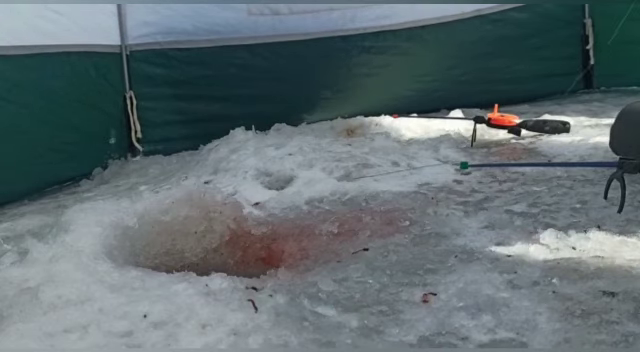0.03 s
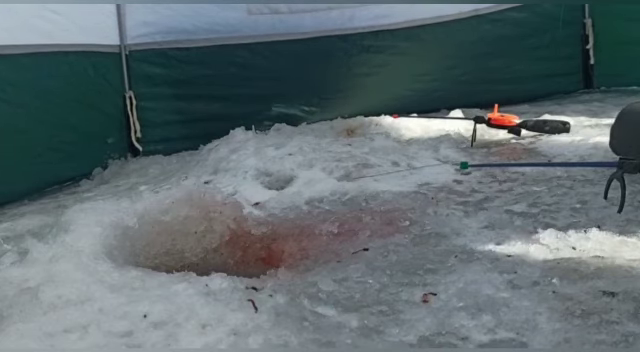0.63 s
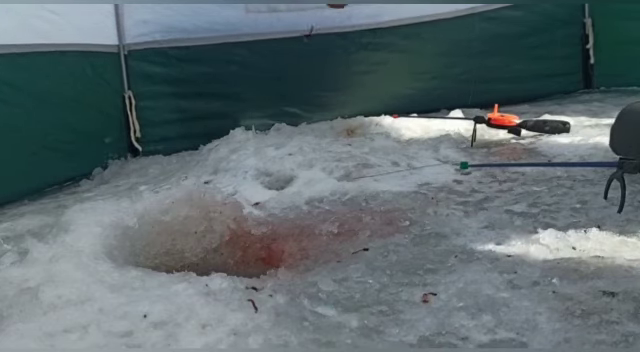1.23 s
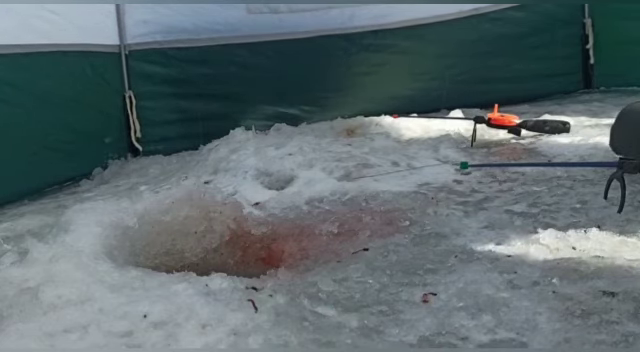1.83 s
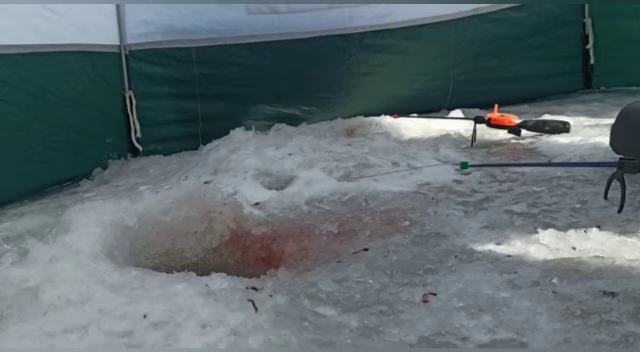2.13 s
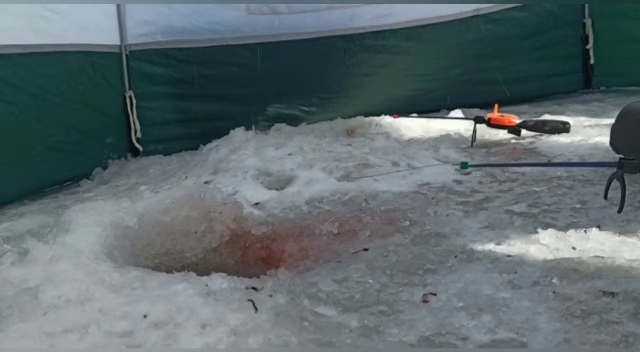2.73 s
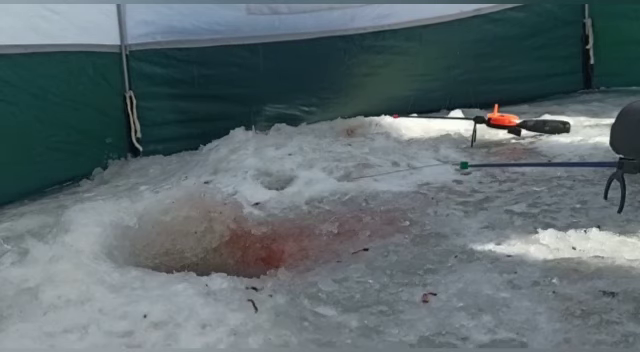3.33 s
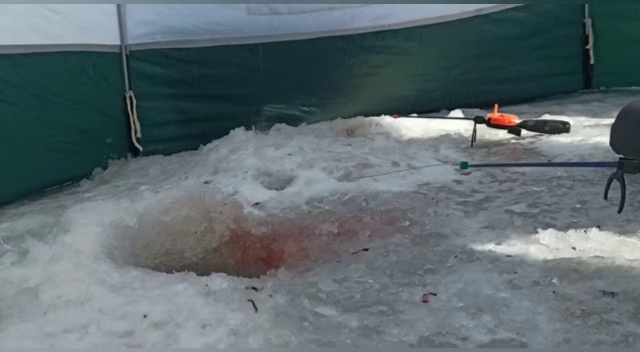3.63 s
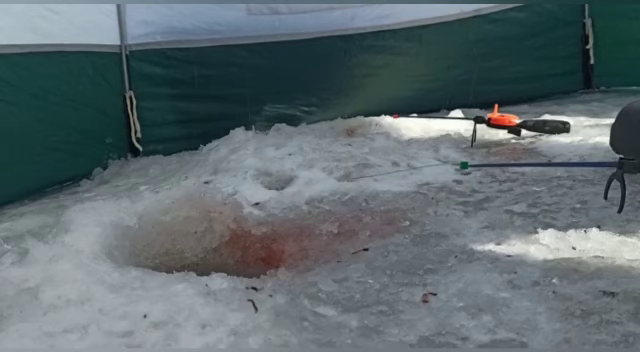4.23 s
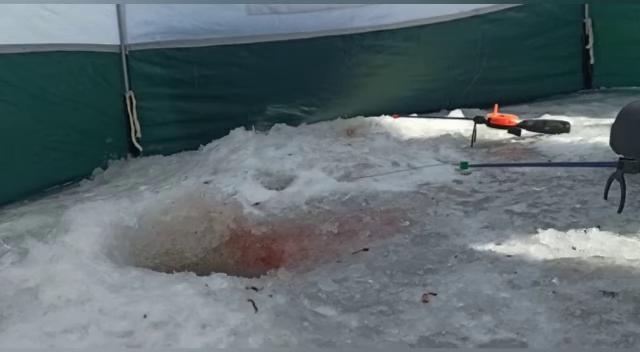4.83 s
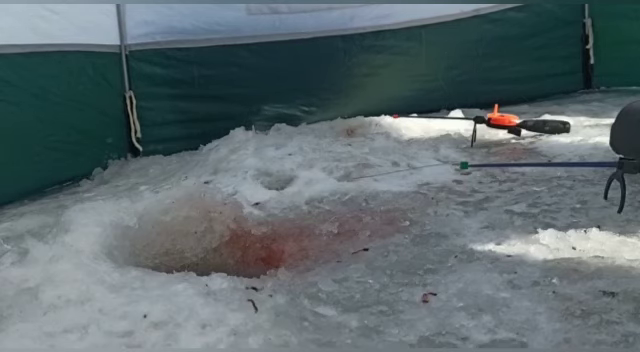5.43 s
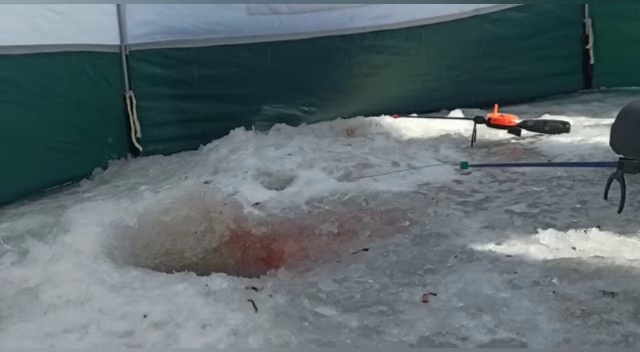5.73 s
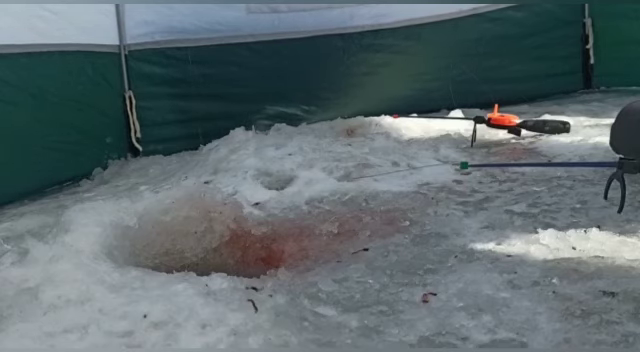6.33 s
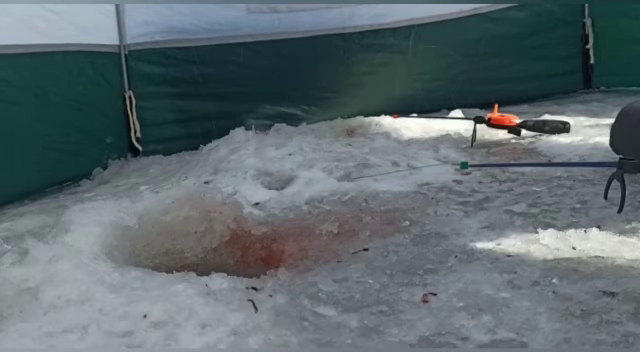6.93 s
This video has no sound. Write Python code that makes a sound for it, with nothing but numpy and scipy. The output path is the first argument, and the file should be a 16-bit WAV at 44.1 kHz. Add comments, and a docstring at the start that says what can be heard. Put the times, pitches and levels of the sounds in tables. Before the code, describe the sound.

The cloth walls of a small tent on lake ice move in the wind throughout. Quick, uneven billows bring low heaves, fluttering and stiff crinkling, with sharp little snaps and dull flaps. The cloth swishes softly in between. It is busiest in the first second, and near five seconds a taut panel drums faintly once. The microphone is inside, with most sound coming from the right.

```python
"""The cloth walls of a fishing tent on lake ice move under the wind, heard from inside.
Each billow heaves whole panels, flutters their folds and crinkles the stiff coating; between billows
the cloth stirs and swishes. Creases snap as they buckle, slack panels flap as they stop short, and
once a taut panel drums. The tent scatters these sounds, most of which reach a small two-port
microphone from the right."""
import sys
import numpy as np
from scipy import signal
from scipy.io import wavfile
from scipy.ndimage import uniform_filter1d

SR = 44100
rng = np.random.default_rng(int(sys.argv[2]) if len(sys.argv) > 2 else 0)


def wav_out(sig):
    """Save sig, one row per channel (or a flat mono array), as 16-bit PCM at SR to the path in sys.argv[1]."""
    wavfile.write(sys.argv[1], SR, np.round(np.clip(np.atleast_2d(sig).T, -1, 1) * 32767).astype(np.int16))


N = 316638
TIME = np.arange(N) / SR
# Places on the walls. Each entry: samples by which the right port leads; the last lies to the left.
LEADS = [8, 10, 12, 13, 14, 16, 11, -6]


def gain_of(db):
    """Amplitude grows tenfold for every 20 dB."""
    return 10 ** (np.asarray(db) / 20)


def unit_rms(x):
    """Normalisation brings the mean power to one."""
    return x / np.sqrt(np.mean(x ** 2) + 1e-20)


def value_at(points, hz):
    """Interpolation along a logarithmic frequency axis."""
    f, value = np.transpose(points)
    return np.interp(np.log(hz + 1), np.log(f + 1), value)


def add(mix, s, sound):
    """Superposition: a sound joins the mix at s seconds."""
    part = mix[:, max(round(s * SR), 0):][:, :sound.shape[1]]
    part += sound[:, :part.shape[1]]


def colour(x, spectrum, size=4096):
    """A minimum-phase filter imposes a spectrum causally."""
    log_gain = np.log(gain_of(value_at(spectrum, abs(np.fft.fftfreq(size, 1 / SR)))))
    taps = np.fft.ifft(np.exp(signal.hilbert(log_gain).conj())).real[:size // 2]
    return signal.oaconvolve(x, taps[None], axes=1)[:, :x.shape[1]]


def ports(x, lead):
    """A path difference delays the left port by lead samples."""
    return np.array([np.roll(x, lead), x])


def steady(x, span_s):
    """Division by the running rms holds the power even over span_s."""
    width = round(span_s * SR)
    power = uniform_filter1d(uniform_filter1d((x ** 2).mean(0), width), width)
    return x / np.sqrt(abs(power) + 1e-12)


def stick_slip(depth_db, grip_s):
    """Stick-slip friction: cloth catches and lets go, so its level varies in clumps."""
    knots = np.arange(0, N / SR + .1, grip_s)
    return unit_rms(gain_of(depth_db * np.interp(TIME, knots, rng.standard_normal(len(knots)))))


def breeze(mean_db=-56, stir_follows=0.67):
    """Wind pressure sets the envelopes of sliding and, over a narrower range, of low stirring."""
    # Pressure on the walls. Each row: time in seconds, relative level in dB.
    wind = [(.12, -55), (.35, -54), (.72, -48.5), (1.0, -53), (1.25, -63.5), (1.58, -54.5), (2.15, -59.5),
            (2.85, -58), (3.05, -59), (4.15, -57), (4.42, -63.5), (4.72, -63.5), (5.03, -55.5), (5.4, -65),
            (5.8, -59.5), (6.3, -54), (6.68, -53), (6.88, -66)]
    wind_db = np.interp(TIME, *np.transpose(wind))
    uneven = stick_slip(depth_db=1.13, grip_s=.03)
    stir_db = mean_db + stir_follows * (wind_db - mean_db)
    return gain_of(stir_db) * uneven, gain_of(wind_db) * uneven


def swell(t, length, rise_share=0.44, rise_curve=1.25):
    """Relaxation: a panel fills quickly up to t = 0, then slackens exponentially."""
    filling = (abs(t) / (rise_share * length)) ** rise_curve
    slackening = t / ((1 - rise_share) * length)
    return np.exp(-np.where(t < 0, filling, slackening))


def billows(usual_length_s=0.038, heave_db_per_doubling=2, heave_lag_s=0.0034, heave_length_ratio=0.92):
    """Incoherent billows add in power, giving the envelopes of heave, flutter and crinkle."""
    # Each row: crest time in seconds, length in seconds, strength in dB, crinkle strength in dB.
    crests = [(0.039, 0.044, -41.5, -41.5), (0.216, 0.033, -36, -38.5), (0.313, 0.17, -47.5, -42),
              (.397, 0.028, -40, -36.5), (0.487, 0.038, -46, -40), (0.529, 0.047, -40, -40),
              (0.615, 0.061, -41.5, -41.5), (0.697, 0.024, -35.5, -43.5), (0.73, 0.036, -47, -48),
              (0.804, 0.038, -37.5, -38.5), (0.908, 0.06, -46, -52), (0.994, 0.013, -57, -44),
              (1.034, 0.0084, -41, -46), (1.227, 0.11, -54.5, -54), (1.362, 0.042, -53, -55),
              (1.44, 0.015, -34.5, -36), (1.469, 0.047, -44, -41), (1.51, 0.024, -45, -49),
              (1.696, 0.02, -38.5, -47), (1.735, 0.026, -35, -36.5), (1.802, 0.032, -47.5, -53.5),
              (1.936, 0.083, -52, -52.5), (2.025, .035, -43, -50), (2.048, 0.022, -38, -49),
              (2.22, 0.022, -49.5, -55), (2.324, .07, -46.5, -49.5), (2.37, 0.03, -36, -41.5),
              (2.462, 0.05, -48, -56), (2.631, 0.058, -51.5, -49), (2.666, 0.029, -35, -52),
              (2.748, 0.027, -45.5, -55), (2.904, 0.019, -40.5, -55), (2.954, 0.062, -41.5, -42.5),
              (3.006, 0.028, -41.5, -50), (3.141, 0.038, -46.5, -43.5), (3.271, 0.12, -52, -54),
              (3.47, 0.082, -45.5, -49.5), (3.508, 0.025, -40.5, -43.5), (3.579, 0.025, -36, -47.5),
              (3.658, 0.021, -47, -52), (3.784, 0.035, -37, -41.5), (3.833, 0.027, -41, -54),
              (3.882, 0.049, -52.5, -52), (4.016, 0.016, -42.5, -45.5), (4.053, 0.054, -44, -46),
              (4.185, 0.02, -40, -41), (4.28, 0.029, -43.5, -48), (4.306, 0.019, -47, -45),
              (4.366, 0.04, -57, -53.5), (4.51, 0.036, -51, -57.5), (4.632, 0.032, -58, -49),
              (4.792, 0.037, -43.5, -44.5), (4.828, 0.051, -44.5, -45), (4.941, 0.069, -53.5, -55),
              (5.091, 0.034, -47.5, -51.5), (5.2, 0.12, -54, -51), (5.334, 0.022, -45, -52.5),
              (5.459, 0.068, -44, -49), (5.582, 0.051, -46.5, -48), (5.666, 0.035, -57, -68),
              (5.766, .085, -44.5, -49.5), (5.886, 0.041, -40, -45.5), (5.941, 0.078, -46, -44),
              (5.973, 0.011, -45, -46), (6.113, 0.077, -47.5, -53), (6.174, 0.11, -44, -46),
              (6.242, 0.012, -55, -47.5), (6.529, 0.046, -42, -43.5)]
    power = np.zeros((3, N))
    for s, length, db, crinkle_db in crests:
        t = np.arange(max(s - .2, 0), s + .35, 1 / SR) - s
        folds = swell(t, length)
        panel = swell(t - heave_lag_s, length * heave_length_ratio)
        # A longer billow moves a larger panel, with more bass.
        heave_db = db + heave_db_per_doubling * np.log2(length / usual_length_s)
        envelopes = gain_of([[heave_db], [db], [crinkle_db]]) * np.array([panel, folds, folds])
        add(power, s + t[0], envelopes ** 2)
    return np.sqrt(power)


def buckles(per_s, spread_db, diffuse, size=8000):
    """Tiny buckles make shot noise; a diffuse share of the power is uncorrelated between the ports."""
    out = np.zeros((2, N))
    for lead in LEADS:
        when, strength, sign, chance = rng.random((4, size))
        sizes = gain_of(spread_db * np.minimum(-np.log(strength), 4)) * np.sign(sign - .5)
        happens = chance < per_s * N / SR / len(LEADS) / size
        out += ports(np.bincount((when * N).astype(int), sizes * happens, N), lead)
    return np.sqrt(1 - diffuse) * unit_rms(out) + np.sqrt(diffuse) * rng.standard_normal((2, N))


def folded(x, patchy_db):
    """Time-varying filtering: each passing fold favours a narrow band for tens of milliseconds."""
    spectra = signal.stft(x, SR, nperseg=256)[2]
    patches = uniform_filter1d(rng.standard_normal(spectra.shape[1:]), size=7, axis=1)
    patches = unit_rms(uniform_filter1d(patches, size=3, axis=0))
    return signal.istft(spectra * unit_rms(gain_of(patchy_db * patches)), SR, nperseg=256)[1][:, :N]


def crackle(per_s=280, low_hz=800, high_hz=12000, decay_cycles=3, spread_db=4.0, size=6000):
    """Small creases tick as damped oscillators, each at its own pitch."""
    when, pitch, strength, place, chance = rng.random((5, size, 1))
    hz = low_hz * (high_hz / low_hz) ** pitch
    n = np.arange(300)
    sizes = gain_of(spread_db * np.minimum(-np.log(strength), 3.5)) * (chance < per_s * N / SR / size)
    ticks = sizes * np.sin(2 * np.pi * hz * n / SR) * np.exp(-hz * n / SR / decay_cycles)
    right = (when * N).astype(int) + n
    left = right + np.take(LEADS, (place * len(LEADS)).astype(int))
    return unit_rms(np.array([np.bincount(at.ravel() % N, ticks.ravel(), N) for at in (left, right)]))


def cloth(heave_db=-1.5, flutter_db=-0.5, crinkle_db=-1.0, swish_db=-1.14,
          sway_db=-2, stir_db=-3.5, crackle_db=-5, sliding_db=-5):
    """Forced vibration: panels heave, folds flutter, the coating crinkles and sliding layers swish."""
    # Spectra of the four motions. Each row: frequency in Hz, relative spectral density in dB.
    heave_spectrum = [(20, -31), (42, -22), (60, -11), (85, -1.5), (160, 1), (240, -2.5), (330, -11.5),
                      (600, -39.5)]
    flutter_spectrum = [(120, -27.5), (230, -5.5), (310, 1.5), (450, 2.5), (620, -3.5), (820, -3),
                        (1100, -12), (1600, -14), (3000, -22.5), (8000, -64)]
    crinkle_spectrum = [(150, -19.5), (600, 5.5), (1100, -2.5), (1800, 2), (3000, -1), (4200, 2.5),
                        (7000, -2), (16000, -8.5)]
    swish_spectrum = [(200, -32), (700, 2.5), (1500, 4), (2500, 1.5), (4200, 2), (7000, -1.5),
                      (16000, -8.5)]
    stir, slide = breeze()
    heaving, fluttering, crinkling = billows()
    heave = steady(colour(buckles(per_s=700, spread_db=2.5, diffuse=0.046), heave_spectrum), 0.039)
    flutter = steady(colour(buckles(per_s=450, spread_db=4.0, diffuse=0.046), flutter_spectrum), 0.049)
    crinkle = steady(colour(buckles(per_s=5000, spread_db=3.5, diffuse=0.2), crinkle_spectrum), 0.066)
    swish = steady(colour(buckles(per_s=3000, spread_db=5.0, diffuse=0.43), swish_spectrum), 0.043)
    low = heave * np.hypot(gain_of(heave_db) * heaving, gain_of(sway_db) * stir)
    low += flutter * np.hypot(gain_of(flutter_db) * fluttering, gain_of(stir_db) * stir)
    crinkling = crinkling * stick_slip(depth_db=4.0, grip_s=0.0066)
    high = gain_of(crinkle_db) * folded(crinkle, patchy_db=2) * crinkling
    high += gain_of(swish_db) * swish * slide
    # Creases tick wherever the cloth bends, less under plain sliding.
    high += gain_of(crackle_db) * crackle() * np.hypot(crinkling, gain_of(sliding_db) * slide)
    return low, high


def snaps(level_db=-2.3, rise_s=0.00026, crack_s=0.0011, run_s=0.0039, run_db=-15):
    """Snap-through buckling: a crease gives one sharp crack, then a short run of smaller ones."""
    # Each row: start in seconds, relative level in dB, dullness as the fall from 3 to 8 kHz in dB.
    creases = [(.046, -32, 12), (.2117, -25, 11), (.399, -27, 12), (0.5351, -27, 7), (.749, -37, -1),
               (.941, -37, 1), (1.15, -45, -10), (1.203, -38.5, 0), (1.2298, -30.5, -1), (1.433, -27.5, -4),
               (1.6107, -36.5, -6), (1.726, -31, 1), (1.969, -35, -4), (2.193, -31, -17),
               (2.289, -42.5, -1), (2.3724, -25, 1.5), (2.4187, -41, -8), (3.1372, -44, 8),
               (3.196, -37.5, -13), (3.203, -33.5, -17), (3.36, -45, -5), (3.828, -41, -6),
               (4.054, -35.5, -6), (4.188, -34.5, -5), (4.3422, -30.5, -3), (4.528, -40.5, 0),
               (5.0704, -32, 1.5), (5.207, -40.5, -15), (5.4163, -42, -10), (5.8817, -36.5, 6),
               (5.968, -34.5, 1), (6.1172, -38, -11), (6.137, -38, -16), (6.161, -36, -18),
               (6.243, -34.5, -19)]
    # Each row: frequency in Hz, relative spectral density in dB.
    snap_spectrum = [(100, -23), (600, 5.5), (1500, 6.5), (4000, 5.5), (7000, 3.5), (16000, -6)]
    out, t = np.zeros((2, N)), np.arange(0, .04, 1 / SR)
    envelope = (1 - np.exp(-t / rise_s)) * (np.exp(-t / crack_s) + gain_of(run_db) * np.exp(-t / run_s))
    for s, db, dull_db in creases:
        burst = ports(envelope * rng.choice([-1, 1], len(t)), rng.choice(LEADS[:-1]))
        pop = colour(burst, snap_spectrum, size=512)
        pop = colour(pop, [(3000, dull_db / 2), (8000, -dull_db / 2)], size=512)
        power = (pop ** 2).mean(0).sum() / (0.0019 * SR)  # the energy as if packed into 1.9 ms
        add(out, s, gain_of(db + level_db) * pop / np.sqrt(power))
    return out


def flaps(level_db=-3.0, width_cycles=0.39, ring_db=-12, ring_s=0.0023):
    """Acceleration noise: a panel stopping short pushes air between two weaker pulls, then shudders."""
    # Each row: time in seconds, relative peak level in dB, centre frequency in Hz.
    stops = [(.2138, -16, 820), (.2264, -18.5, 454), (.5331, -30, 520), (.549, -30, 266), (.61, -23, 744),
             (.6866, -26, 230), (.695, -28, 330), (.7024, -22.5, 432), (1.4399, -23, 240),
             (1.735, -22, 790), (1.741, -31, 430), (2.0096, -28.5, 438), (2.03, -32, 410),
             (2.3734, -21, 780), (2.6725, -29.5, 290), (2.9009, -32.5, 458), (2.944, -27, 226),
             (3.1395, -33, 640), (3.462, -31, 418), (3.571, -31, 738), (3.5845, -20, 650),
             (3.7733, -19.5, 368), (3.789, -25, 474), (4.1908, -28, 206), (4.3099, -24, 740),
             (4.3432, -29.5, 644), (4.509, -34.5, 320), (4.78, -33.5, 477), (4.829, -22.5, 350),
             (5.4637, -28.5, 372), (5.4727, -24.5, 396), (5.8598, -30, 428), (5.8908, -26.5, 188),
             (6.001, -30, 392), (6.1824, -30.5, 180), (6.2433, -31.5, 380), (6.3506, -31, 360),
             (6.5323, -18.5, 544)]
    out, t = np.zeros((2, N)), np.arange(-.01, .03, 1 / SR)
    for s, db, hz in stops:
        cycles = hz * t
        pulse = np.exp(-.5 * (cycles / width_cycles) ** 2)
        shudder = gain_of(ring_db) * (t > 0) * (1 - pulse) * np.exp(-abs(t) / ring_s)
        push = np.cos(2 * np.pi * cycles) * (pulse + shudder)
        push -= pulse * push.sum() / pulse.sum()  # no net air is moved
        add(out, s + t[0], gain_of(db + level_db) * ports(push, rng.choice(LEADS[:-1])))
    return out


def drum(start_s=4.908, rise_s=0.0035):
    """A panel pulled taut rings in the low normal modes of a membrane."""
    # Each row: frequency in Hz, level in dB, time to decay by 60 dB in seconds.
    modes = [(206, -39, 0.33), (296, -51, 0.23), (356, -50.5, 0.38)]
    out, t = np.zeros((2, N)), np.arange(0, .4, 1 / SR)
    ring = sum(gain_of(db - 60 * t / t60) * np.sin(2 * np.pi * hz * t) for hz, db, t60 in modes)
    add(out, start_s, ports(ring * (1 - np.exp(-t / rise_s)), LEADS[0]))
    return out


def tent(x, wet_db, size=5000, count=3, drift_hz=5):
    """Reverberation: sound scatters between ice and cloth, the echoes changing as the walls move."""
    # Each row: frequency in Hz, reverberation time in seconds.
    decay_times = [(100, 0.11), (500, 0.07), (2000, 0.088), (8000, 0.075), (16000, 0.069)]
    taps = rng.choice([-1., 1.], (count, 2, size)) * (rng.random((count, 2, size)) < .12)
    taps[..., :round(.002 * SR)] = 0
    hz, t, spectra = signal.stft(taps, SR, nperseg=128)
    decay = gain_of(-60 * t / value_at(decay_times, hz)[:, None])
    tails = signal.istft(spectra * decay, SR, nperseg=128)[1]
    tails /= np.linalg.norm(tails, axis=-1, keepdims=True)
    scatter = np.zeros((2, N))
    for k, tail in enumerate(tails):
        weight = np.sqrt(2 / count) * np.cos(np.pi * (2 * drift_hz * TIME + k / count))
        scatter += signal.oaconvolve(x * weight, tail, axes=1)[:, :N]
    return (x + gain_of(wet_db) * scatter) / np.hypot(1, gain_of(wet_db))


def scene():
    """The sounds of the walls superpose; the small tent scatters treble more than bass."""
    low, high = cloth()
    inside = tent(low + flaps(), wet_db=-10.0) + tent(high + snaps(), wet_db=-5.5) + drum()
    return inside * gain_of([[-.4], [.4]])  # slightly louder on the right


def record(dry, edge_hz=15850):
    """Each port has its own uneven frequency response; a low-pass filter limits the band."""
    # Each row: frequency in Hz, left gain in dB, right gain in dB.
    port_response = [(1000, 1, 1), (4740, 2.5, 3), (4840, -2, -3), (6000, 1, -0.5), (6070, 3, 5),
                     (6320, 8.5, 7), (7690, 11.5, 7), (7830, -4.5, 4), (8390, 5.5, 6.5), (8680, -4.5, -6),
                     (9480, -12.5, -13), (11600, -40, -21), (11450, -2.5, 0.5), (14900, 3.5, 5)]
    hz, *sides = np.transpose(port_response)
    heard = np.vstack([colour(x[None], np.c_[hz, db]) for x, db in zip(dry, sides)])
    low_pass = signal.firwin(511, edge_hz, window=("kaiser", 8), fs=SR)
    return signal.oaconvolve(heard, low_pass[None], "same")


dry = scene()
out = record(dry)
wav_out(out)
```